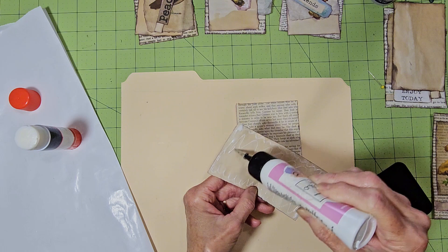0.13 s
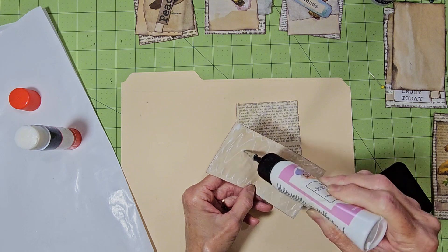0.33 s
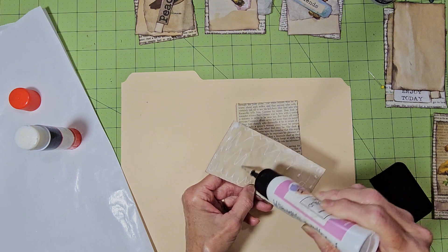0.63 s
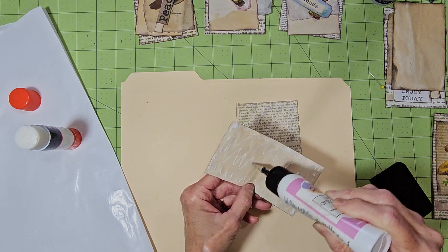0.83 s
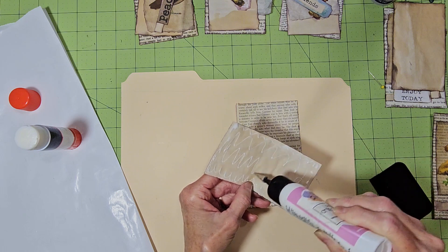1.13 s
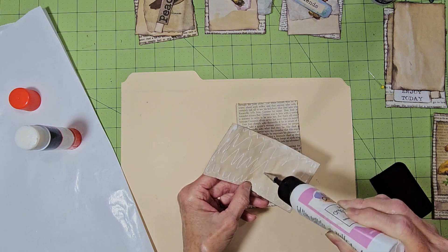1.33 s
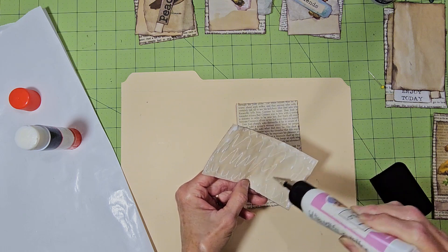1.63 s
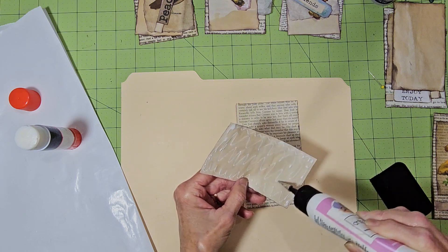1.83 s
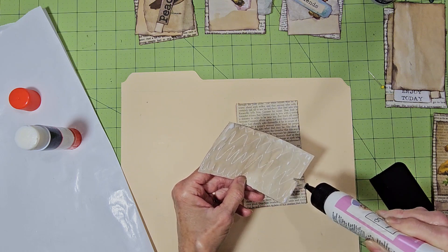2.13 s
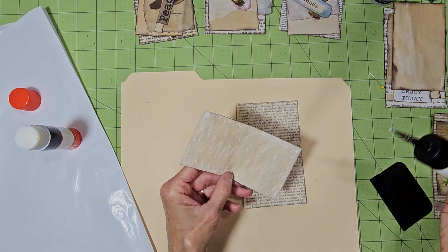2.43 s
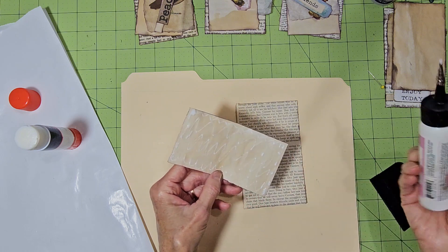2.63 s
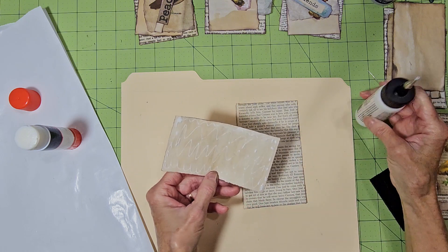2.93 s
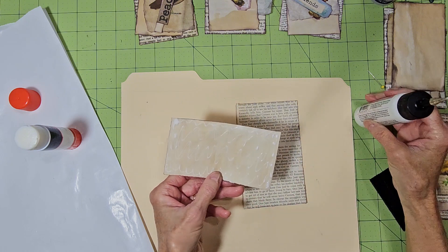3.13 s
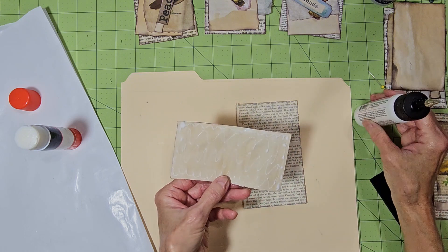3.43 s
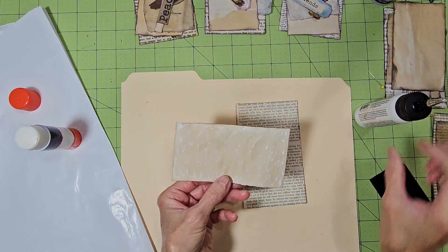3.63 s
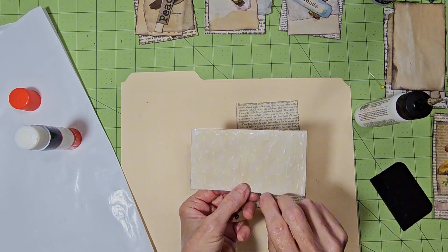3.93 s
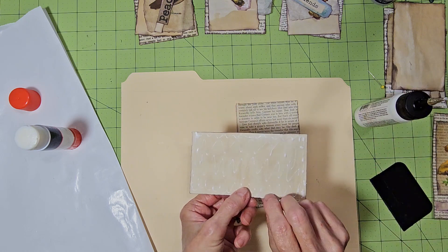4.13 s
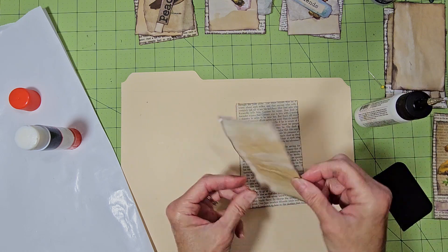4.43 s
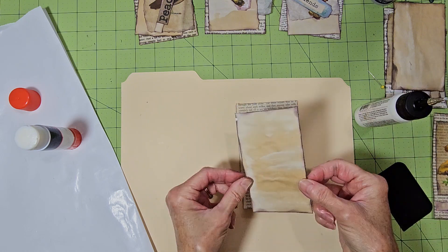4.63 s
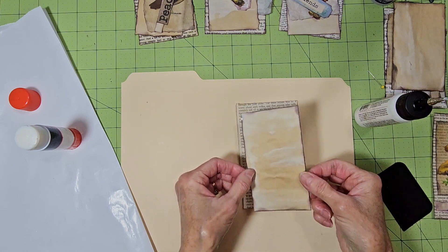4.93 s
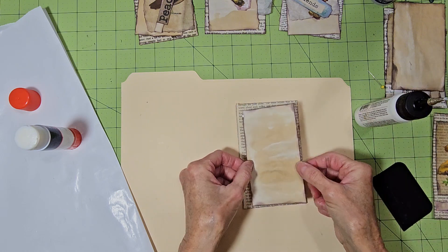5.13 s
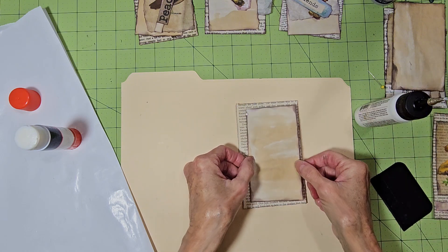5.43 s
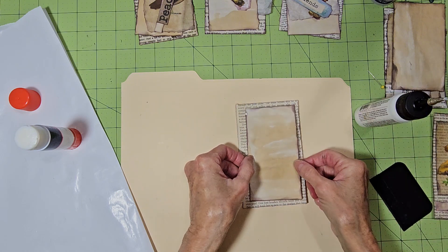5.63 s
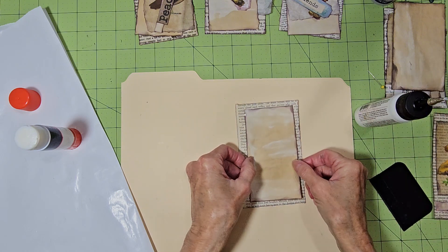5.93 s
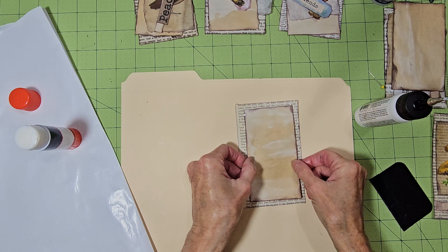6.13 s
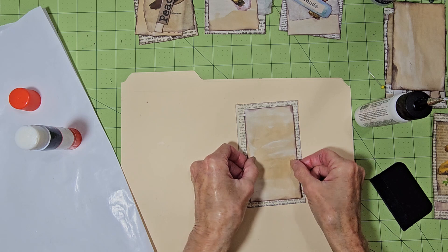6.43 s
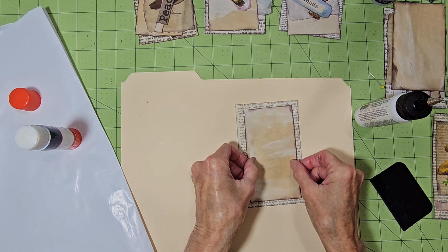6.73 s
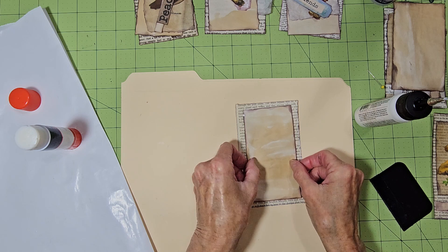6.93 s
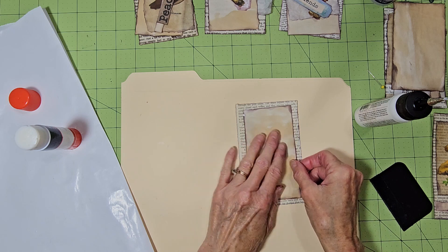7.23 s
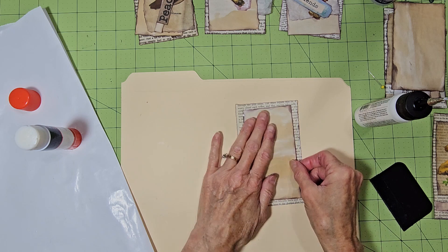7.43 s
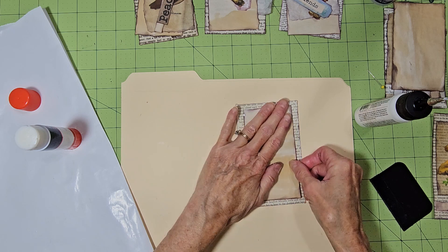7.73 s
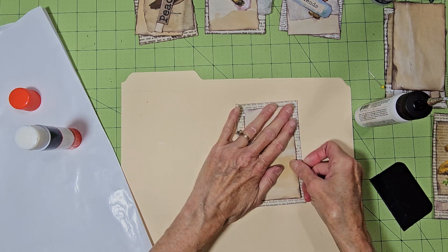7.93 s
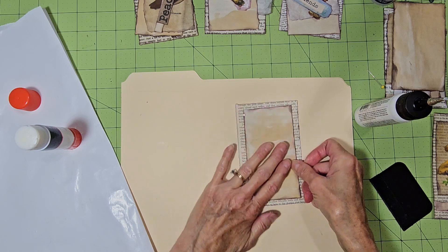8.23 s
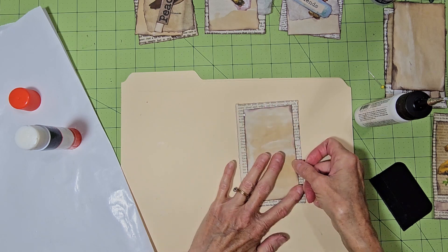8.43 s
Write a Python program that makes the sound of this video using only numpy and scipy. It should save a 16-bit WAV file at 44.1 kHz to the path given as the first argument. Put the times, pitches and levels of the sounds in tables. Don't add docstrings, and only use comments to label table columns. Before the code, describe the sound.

A glue nozzle scratches quick short strokes on stiff paper, then small ticks, a soft thump and dry palm rubbing over low ventilation hum.

```python
import sys
import numpy as np
from scipy import signal
from scipy.fft import rfft, irfft
from scipy.io import wavfile
from scipy.ndimage import uniform_filter1d

SR = 44100
rng = np.random.default_rng(int(sys.argv[2]) if len(sys.argv) > 2 else 0)


def dump_mix(stems):
    frames = np.atleast_2d(stems).T
    limited = np.clip(frames, -1, 1)
    pcm = np.round(limited * 32767).astype(np.int16)
    wavfile.write(sys.argv[1], SR, pcm)


def volts_from_decibels(level):
    exponent = np.asarray(level, float) / 20
    return 10 ** exponent


N = 379260
T = np.arange(N) / SR
HZ = np.maximum(np.fft.rfftfreq(N, 1 / SR), 1)

# f/Hz, level/dB
AIR_COLOUR = [(15, -26.5), (25, -14), (47, 0.5), (61, -8.5), (92, 4.5), (108, -2), (128, -9.5),
              (175, -23.5), (230, -18), (295, -19.5), (330, -39), (450, -71)]
# f/Hz, density/(dB per Hz)
HISS_COLOUR = [(250, -18.5), (340, -7), (480, -3), (850, -12.5), (1600, -18), (1880, -13), (2350, -22),
               (2850, -20.5), (4500, -28.5), (7500, -39), (10600, -58), (11500, -34), (12300, -46),
               (16000, -45)]
# t/s, level/dB
RUMBLE_SWELL = [(0.0, -58.5), (2.66, -56.5), (3.54, -55), (3.97, -59), (4.6, -53.5), (5.8, -58.5),
                (8.26, -55), (8.6, -57.5)]
# f/Hz, rms level/dB
HUM_LINES = [(120.01, -72), (186.8, -78), (240.02, -63.5), (360.03, -88)]
# t/s, depth/(0-1)
THROB_DEPTH = [(0, .3), (2.8, .4), (4.5, .65), (8.6, .5)]
# f/Hz, likeness/(0-1)
PORT_LIKENESS = [(25, .975), (90, .99), (180, .9), (300, .84), (640, .25), (3000, .12), (15000, .1)]
# f/Hz, level/dB
PORT_TILT = [(200, 5), (700, 1), (2400, 1.5), (8000, -4), (15000, -1)]
AIR_DB, HISS_DB = -52, -67.5
THROB_HZ, THROB_DIP_S = 5.17, 5.65

# start t/s, length/s, ring f/Hz, level/dB
TIP_CATCHES = [(0.027, .008, 1260, -56), (0.043, .03, 3700, -60), (0.162, .015, 1600, -53),
               (0.239, .01, 1300, -49), (0.263, 0.0087, 1690, -46), (0.279, 0.017, 3870, -46.5),
               (0.28, 0.0099, 1450, -46), (0.364, 0.028, 3760, -56), (0.382, 0.016, 1800, -55),
               (0.522, 0.021, 1400, -51), (0.607, .015, 1300, -58), (0.709, 0.02, 1320, -40),
               (0.745, 0.014, 1350, -43.5), (0.833, .015, 1300, -52), (0.927, 0.012, 1300, -50),
               (0.945, 0.018, 3820, -63), (1.046, .018, 2570, -56), (1.144, 0.025, 1750, -48),
               (1.16, .02, 2500, -53), (1.208, 0.0092, 1350, -53), (1.303, .015, 1390, -57),
               (1.377, .02, 4400, -55), (1.406, 0.023, 2900, -52), (1.434, 0.018, 765, -55.5),
               (1.438, .02, 1780, -52.5), (1.509, .012, 1450, -51), (1.553, .022, 1740, -52),
               (1.634, .03, 4660, -51.5), (1.65, 0.016, 2150, -48), (1.657, .025, 1235, -47.5),
               (1.729, .012, 1260, -52), (1.776, .01, 1330, -59), (1.838, 0.014, 1310, -56),
               (1.877, 0.014, 1320, -46.5), (1.878, .012, 1780, -55), (1.947, .015, 1320, -51.5),
               (1.954, 0.024, 904, -54), (2.067, 0.016, 1500, -49.5), (2.082, .015, 4540, -53.5),
               (2.088, .03, 794, -55)]
# start t/s, length/s, ring
# f/Hz, level/dB
CARD_CREASES = [(2.894, 0.013, 6500, -72), (2.895, 0.013, 4500, -74), (2.931, 0.033, 3200, -63),
                (2.934, .025, 5500, -63), (3.037, 0.019, 7500, -70), (3.356, .008, 1400, -62),
                (4.769, .006, 1750, -69), (4.771, .005, 3700, -76), (4.792, 0.0099, 1340, -64),
                (4.793, 0.0087, 4500, -70), (4.812, .012, 1300, -70), (4.816, .02, 4400, -75),
                (4.905, .008, 1250, -73), (4.933, 0.019, 4030, -63), (4.935, .012, 1280, -66),
                (4.984, .008, 1320, -69), (4.985, .008, 3120, -70), (5.094, 0.013, 2110, -71),
                (5.342, .01, 4480, -69), (5.343, .008, 2100, -72), (5.406, 0.022, 8000, -76),
                (5.51, .005, 3200, -73)]
CATCH_RISE_S, CATCH_WIDTH_SHARE = .0015, .1

# f/Hz, density/(dB per Hz)
CARD_COLOUR = [(210, -43), (350, -6), (548, -3.5), (914, -7), (1320, -4), (1630, -18), (1760, -5.5),
               (2940, -28), (4380, -20.5), (5840, -23), (7550, -22), (10400, -32.5), (16000, -40)]
# f/Hz, width/Hz, level/dB
SHEET_MODES = [(1320, 134, 4), (1760, 510, -3), (2340, 85, -29), (3740, 100, -29.5), (6240, 900, -31),
               (7460, 460, -19.5)]
# centre t/s, length/s, pressure level/dB, tip bite level/dB, local card ring f/Hz
NOZZLE_STROKES = [(0.055, 0.058, -60, -5, 1350), (0.168, 0.044, -56.5, -3, 1570),
                  (0.284, 0.046, -49, -3.5, 1520), (0.388, 0.038, -58, 1, 1420),
                  (0.519, 0.055, -52.5, -4.5, 1320), (0.729, 0.058, -44, -10, 1256),
                  (0.841, 0.035, -58.5, -7.5, 1310), (0.948, 0.048, -51, -2.5, 1450),
                  (1.059, 0.047, -55.5, -3.5, 1450), (1.176, 0.06, -49.5, 2.5, 1290),
                  (1.303, 0.042, -56.5, -10.5, 1450), (1.415, 0.056, -51.5, 0, 1440),
                  (1.54, 0.063, -52.5, -9, 1640), (1.651, 0.054, -50, -2, 1440),
                  (1.76, 0.06, -57.5, -10.5, 1240), (1.868, 0.052, -49.5, -11.5, 1330),
                  (1.966, 0.033, -54.5, -15.5, 1390), (2.09, 0.054, -50, -9.5, 1490),
                  (2.199, 0.033, -67, -12, 1350)]
# t/s, f/Hz
SCRATCH_PATH = [(0, 3570), (.6, 3600), (1.25, 4170), (1.45, 3060), (1.62, 4570), (2.2, 4650)]
# t/s, f/Hz
FLAP_PITCH = [(0, 820), (.5, 850), (1.06, 790), (1.42, 734), (1.54, 500), (1.66, 580), (1.76, 706),
              (1.97, 900), (2.2, 800)]
# t/s, level/dB
FINGER_SLACK = [(0, 1.5), (1.08, 1), (1.15, -17), (1.33, -16), (1.4, -1), (1.65, 6), (1.76, -3.5),
                (1.95, 3.5), (2.2, -2.5)]
FLAP_DB, FLAP_SHARE = -62.5, 0.26
FIBRE_DB, FIBRE_SHARE = -9, 0.58
SCRATCH_SWING_HZ, FLAP_SWING_HZ = 250, 30
BIGGEST_SLIP_ODDS = .004

# centre t/s,
# length/s, scratch level/dB, flap rel level/dB, hiss rel level/dB
LOOSE_RUSTLES = [(0.607, 0.033, -72, 17.5, 2), (0.653, 0.029, -55, 2.5, -6), (2.416, 0.035, -72.5, 7, -5),
                 (2.462, 0.047, -83, -10, 5), (2.617, 0.13, -82.5, -6, 0), (2.842, 0.047, -86, 4, -9),
                 (2.949, 0.047, -65, 1, -11), (3.97, 0.066, -82, -12, -3), (4.066, 0.031, -78, 3, -7),
                 (4.253, 0.038, -66.5, -4, -1), (4.323, 0.034, -92, 18, -7), (4.355, 0.11, -83, 4, -15),
                 (4.565, 0.043, -84.5, 10, -11), (4.685, 0.061, -78, 1.5, -9), (5.506, 0.032, -78, -22, -1),
                 (5.596, 0.033, -102, -12, -5), (5.824, 0.094, -99, -7, 10), (6.128, 0.022, -77, -20, -6),
                 (6.44, 0.033, -86, -10, -20), (6.911, 0.04, -79.5, -20, 3),
                 (7.002, 0.08, -75.5, -27, -0.5)]
# centre t/s, length/s, scratch level/dB, ring rel level/dB
TIGHT_BENDS = [
    (3.202, 0.11, -85.5, 6),
    (4.802, 0.073, -78, 2.5),
    (4.942, 0.033, -70, -3),
    (4.989, 0.016, -69, -6),
    (5.105, 0.026, -76, 3),
    (5.351, 0.018, -71, -7),
    (7.778, 0.058, -78, -6),
]
LOOSE_RING_DB, TIGHT_FLAP_DB, TIGHT_FIBRE_DB = -16, -9, -7.5

# t/s, peak level/dB, ring f/Hz, crack rel level/dB, crack f/Hz
DULL_TAPS = [(0.632, -27.5, 1560, -28, 2800), (0.64, -21.5, 1820, -8, 4170),
             (1.198, -22, 1320, -10.5, 4100), (1.146, -39, 1710, -10, 4000), (2.068, -46, 1510, -10, 4400),
             (2.235, -59, 1400, -13, 4570), (2.395, -37.5, 1220, -17, 4460), (2.931, -38, 614, 4.5, 3220),
             (3.024, -49.5, 1320, -1, 2300), (3.256, -62, 2430, -25, 2860), (3.358, -52, 1400, -40, 3290),
             (3.998, -38.5, 890, -14, 2950), (4.055, -68, 1390, -10, 4690), (4.164, -51.5, 624, 0, 4630),
             (4.193, -46, 820, -20, 2850), (4.546, -64, 655, 4, 2850), (4.942, -61, 1260, 2, 4200),
             (4.987, -59.5, 1280, 5, 4500), (5.35, -61.5, 2070, -1, 3810), (6.109, -39, 2280, -3, 5400),
             (7.185, -52, 2600, 4, 5000), (7.194, -36.5, 2150, 11.5, 5800), (7.71, -58.5, 770, -3, 4960)]
# t/s, crack level/dB, crack f/Hz, snap rel level/dB
BRIGHT_SNAPS = [(0.868, -49, 4800, 1), (2.424, -47.5, 7200, -10), (2.532, -66, 2900, -19),
                (2.864, -61.5, 4460, -11), (3.023, -48, 4530, -4), (4.243, -43, 2930, -1),
                (5.4, -50, 6000, -2), (5.502, -56.5, 6850, -15.5), (5.806, -62, 6670, -24),
                (6.758, -52.5, 5350, -5), (6.91, -51, 5100, -2), (7.178, -48.5, 7330, 0),
                (7.776, -58, 6000, -5), (7.852, -47, 6740, -6), (8.374, -61, 5560, -2),
                (8.495, -53, 8300, -4), (8.51, -49, 7860, -10), (8.55, -61, 2700, -5),
                (8.569, -44, 4770, -10), (8.583, -53, 6500, -1)]
# t/s, peak level/dB, ring f/Hz
TAP_OVERTONES = [(2.395, -47.5, 2500), (2.395, -55.5, 4610), (2.425, -54, 2500), (2.425, -58, 1400),
                 (3.998, -43, 1420), (3.998, -50, 2200), (4.011, -56, 900), (4.011, -59, 2100),
                 (4.194, -56, 2200), (6.109, -42, 1350), (6.109, -52, 6230), (6.123, -58, 2300),
                 (7.194, -41, 3700), (7.194, -50, 8000), (7.194, -38, 6030), (7.194, -48.5, 1360),
                 (0.64, -36, 600), (0.632, -43, 700), (2.395, -48, 600), (1.198, -38.5, 750),
                 (8.57, -49.5, 2700), (8.57, -50, 8000), (2.931, -48, 3700), (4.156, -68, 6000),
                 (4.248, -58, 2800)]
TAP_SNAP_DB = -40
SNAP_RING_DB, SNAP_RING_HZ = -21.5, 1720
RATTLE_DB_PER_KHZ = 1

# t/s, level/dB
DESK_BLOWS = [
    (2.9322, -32),
    (3.024, -52.5),
    (4.236, -57),
    (7.188, -51),
]
# f/Hz, level/dB, t60/s
DESK_RINGS = [(75.5, -8, 0.53), (142, -1, 0.085), (225, -3, 0.094), (301, -24, 0.17), (475, -16, 0.039)]

# centre t/s, length/s, f/Hz, level/dB
SKIN_CHIRPS = [
    (4.36, .12, 2850, -88),
    (4.62, .16, 2850, -83),
    (5.25, .04, 4400, -87),
    (5.95, .03, 4800, -85),
    (7.005, .06, 2600, -78),
]

# f/Hz, density/(dB per Hz)
SKIN_COLOUR = [(590, -59.5), (1000, 8), (1350, -8.5), (2150, -14), (2940, -11), (5310, 0), (8850, -6),
               (10300, -11.5), (11700, -5.5), (15100, -8), (16000, -24)]
# start t/s, end t/s, start pressure level/dB, end pressure level/dB
PALM_RUBS = [
    (7.2, 7.285, -57.5, -58.5),
    (7.315, 7.8, -65.5, -69.5),
    (7.395, 7.66, -66, -62.5),
    (7.76, 7.5, -77, -80),
    (7.865, 7.857, -79, -65.5),
    (7.967, 8.358, -54.5, -58.5),
    (8.516, 8.526, -71, -71.5),
    (8.58, 8.9, -65, -67),
    (8.598, 7.4, -68, -65),
]
GRIP_DB_PER_S, LIFT_DB_PER_S, LAND_DB_PER_S = 260, 330, 900
RUB_HISS_DB, RUB_LOW_DB, LOW_SHARE = -3.5, -13, -0.43
RUB_WAVER_DB = 1.8

ROOM_T60_S, ROOM_DB = 0.15, -9
TOP_HZ = 15850


def over_hz(points):
    hz, value = np.transpose(points)
    return np.interp(np.log(HZ), np.log(hz), value)


def over_s(points, s):
    return np.interp(s, *np.transpose(points))


def short_axes(size):
    return np.arange(size) / SR, np.maximum(np.fft.rfftfreq(size, 1 / SR), 1)


def shape(x, gain):
    return irfft(rfft(x) * gain, N)


def unit(x):
    return x / np.sqrt(np.mean(x ** 2))


def band(lo_hz, hi_hz):
    return 1 / np.sqrt((1 + (lo_hz / HZ) ** 12) * (1 + (HZ / hi_hz) ** 12))


def mode(hz, width_hz, at_hz):
    return 1 / (1 + 1j * (at_hz ** 2 - hz ** 2) / (at_hz * width_hz))


def mottle(at_hz, spread_db, lumps):
    knots = np.linspace(np.sqrt(300.), np.sqrt(17000.), lumps)
    return volts_from_decibels(spread_db * np.interp(np.sqrt(at_hz), knots, rng.standard_normal(lumps)))


def walk(rate_hz):
    k = int(SR / rate_hz)
    held = np.repeat(rng.standard_normal(N // k + 1), k)
    return 1.67 * uniform_filter1d(uniform_filter1d(held, k), k)[:N]


def slips(per_s, spread_db, hiss):
    chance, rarity, sign = rng.random((3, N))
    size = volts_from_decibels(-spread_db * np.log(rarity + BIGGEST_SLIP_ODDS))
    clicks = (chance < per_s / SR) * size * np.sign(sign - .5)
    return unit(clicks) + hiss * rng.standard_normal(N)


def air():
    like = np.clip(over_hz(PORT_LIKENESS), 0, 1)
    mid, side = rng.standard_normal((2, N))
    colour = volts_from_decibels(over_hz(AIR_COLOUR)) + volts_from_decibels(HISS_DB - AIR_DB - 10 + over_hz(HISS_COLOUR))
    mid = shape(mid, colour * np.sqrt(1 + like))
    side = shape(side, colour * np.sqrt(1 - like))
    noise = np.array([mid + side, mid - side]) * volts_from_decibels(AIR_DB) / np.std(mid)
    swell_db = over_s(RUMBLE_SWELL, T)
    noise += shape(noise, band(67, 160)) * (volts_from_decibels(swell_db - swell_db.mean()) - 1)
    port_lag_s = np.array([[0], [1.6e-4]])
    throb = 1 - over_s(THROB_DEPTH, T) * np.cos(2 * np.pi * THROB_HZ * (T - THROB_DIP_S))
    hum = sum(np.sqrt(2) * volts_from_decibels(db) * np.sin(2 * np.pi * hz * (T - port_lag_s)) for hz, db in HUM_LINES)
    return noise + throb * hum


def catches():
    size = 8192
    t, at_hz = short_axes(size)
    out = np.zeros((2, N + size))
    fibres = np.array([slips(1500, 3.5, .4), slips(1500, 3.5, .4)])
    for s, length_s, hz, db in TIP_CATCHES + CARD_CREASES:
        i = int(s * SR)
        grip = np.minimum(t / CATCH_RISE_S, 1) * np.exp(-(t / length_s) ** 2)
        width_hz = CATCH_WIDTH_SHARE * hz
        patch = mode(hz, width_hz, at_hz) * mode(hz, 4 * width_hz, at_hz)
        ringing = irfft(rfft(grip * fibres[:, i:i + size]) * patch)
        out[:, i:i + size] += volts_from_decibels(db) * np.sqrt(np.mean(grip ** 2)) * unit(ringing)
    return out[:, :N]


def card(rows, wander, ring_db, mottle_db, patchy_db, drag_db, square):
    size, half = 16384, 8192
    t, at_hz = short_axes(size)
    t = t - half / SR
    out = np.zeros((2, N + size))
    body = np.interp(at_hz, HZ, volts_from_decibels(over_hz(CARD_COLOUR)))
    body = body + volts_from_decibels(ring_db) * sum(volts_from_decibels(db) * mode(hz, width_hz, at_hz) for hz, width_hz, db in SHEET_MODES)
    edges_hz = [(400, 980), (980, 2700), (2700, 5700), (5700, 17000)]
    bands = [np.interp(at_hz, HZ, band(*edge)) for edge in edges_hz]
    fibres = np.pad([slips(1800, 3.3, .5), slips(1800, 3.3, .5)], ((0, 0), (half, size)), "wrap")
    patches = np.pad([volts_from_decibels(patchy_db * walk(70)) for _ in bands], ((0, 0), (half, half)), "wrap")
    bite = square + 0.43 * (t < 0)
    for s, length_s, *range_db in rows:
        i = int(s * SR)
        places_hz = [np.interp(s, wander[0], hz) for hz in wander[1:]]
        local = 1 + sum(1.3 * mode(hz, 0.081 * hz, at_hz) for hz in places_hz)
        colour = body * mottle(at_hz, mottle_db, lumps=64) * local
        drag = volts_from_decibels(drag_db) * np.exp(-(t / .085) ** 2)
        speed = np.exp(-np.abs(t / (.6 * length_s)) ** bite) + drag
        for k, (db, edge, patch) in enumerate(zip(range_db, bands, patches)):
            j = i + 2048 * k
            ringing = irfft(rfft(fibres[:, j:j + size]) * colour * edge)
            level = volts_from_decibels(db) * np.sqrt(np.mean(speed ** 2))
            out[:, i:i + size] += level * unit(speed * patch[i:i + size] * ringing)
    return out[:, half:-half]


def strokes():
    s, length_s, db, bite_db, hz = np.transpose(NOZZLE_STROKES)
    flap_db = FLAP_DB + FLAP_SHARE * (db - db.mean()) + over_s(FINGER_SLACK, s)
    hiss_db = db + FIBRE_DB + FIBRE_SHARE * bite_db
    rows = np.transpose([s, length_s, flap_db, db, db + bite_db, hiss_db])
    chance = rng.uniform(-0.77, 1, (len(s), 2)).T
    scratch_hz = over_s(SCRATCH_PATH, s) + SCRATCH_SWING_HZ * chance[0]
    flap_hz = over_s(FLAP_PITCH, s) + FLAP_SWING_HZ * chance[1]
    return card(rows, [s, hz, scratch_hz, flap_hz],
                ring_db=-8.5, mottle_db=3.2, patchy_db=2.8, drag_db=-20.5, square=2.12)


def rustles():
    rows = [(s, length_s, db + flap_db, db + flap_db + LOOSE_RING_DB, db, db + hiss_db)
            for s, length_s, db, flap_db, hiss_db in LOOSE_RUSTLES]
    rows += [(s, length_s, db + ring_db + TIGHT_FLAP_DB, db + ring_db, db, db + TIGHT_FIBRE_DB)
             for s, length_s, db, ring_db in TIGHT_BENDS]
    return card(rows, [0], ring_db=-7, mottle_db=3.2, patchy_db=4., drag_db=-45, square=2.2)


def ticks():
    size = 2048
    t, at_hz = short_axes(size)
    out = np.zeros((2, N + size))
    sheet = sum(volts_from_decibels(db) * mode(hz, 3 * width_hz, at_hz) for hz, width_hz, db in SHEET_MODES[:3])
    rows = [(*tap, tap[3] + TAP_SNAP_DB) for tap in DULL_TAPS]
    rows += [(s, db + SNAP_RING_DB, SNAP_RING_HZ, -SNAP_RING_DB, hz, snap_db - SNAP_RING_DB)
             for s, db, hz, snap_db in BRIGHT_SNAPS]
    rows += [(s, db, hz, TAP_SNAP_DB, hz, 2 * TAP_SNAP_DB) for s, db, hz in TAP_OVERTONES]
    burst = np.exp(-t / .0008) * np.minimum(t / .0003, 1) + .07 * np.exp(-t / .01)
    for s, db, hz, crack_db, crack_hz, snap_db in rows:
        grit = rng.standard_normal((5, size)) * burst
        ring = (1 - np.exp(-t / .0002)) * np.sin(2 * np.pi * hz * t) * np.exp(-t / .0011)
        ring = irfft(rfft(ring) * (1j * at_hz / (.45 * hz + 1j * at_hz)) ** 2)
        rattle = irfft(rfft(grit[4]) * sheet * mode(1720.0, 1600.0, at_hz) ** 2)
        crack_colour = mode(crack_hz, 0.34 * crack_hz, at_hz) ** 2 + 0.33 * mode(4300.0, 4000.0, at_hz) ** 3
        crack_colour = mottle(at_hz, 4.4, lumps=40) * crack_colour
        crack = irfft(rfft(grit[0] + 0.97 * grit[1:3]) * crack_colour)
        crumbs = .3 * np.roll(grit[:2], 90, axis=1) + .2 * np.roll(grit[3:5], 230, axis=1)
        snap_colour = mottle(at_hz, 4., lumps=40) * mode(9500., 5000., at_hz) ** 2
        snap = irfft(rfft(grit[2:4] + crumbs) * snap_colour)
        rattle_db = -7.5 - RATTLE_DB_PER_KHZ * hz / 1000
        parts = [(ring, 0), (rattle, rattle_db), (crack, crack_db), (snap, snap_db)]
        tick = sum(volts_from_decibels(db + part_db) * part / np.abs(part).max() for part, part_db in parts)
        i = int(s * SR)
        out[:, i:i + size] += (t < t[-1] * 3 / 4) * tick
    return shape(out[:, :N], volts_from_decibels(np.outer([.5, -.5], over_hz(PORT_TILT))))


def desk():
    out = np.zeros(N)
    for s, blow_db in DESK_BLOWS:
        t = np.maximum(T - s, 0)
        onset = np.minimum(t / 0.00066, 1)
        for hz, db, t60_s in DESK_RINGS:
            out += volts_from_decibels(blow_db + db) * np.sin(2 * np.pi * hz * t) * volts_from_decibels(-60 * t / t60_s) * onset
    return out


def squeaks():
    out = np.zeros(N)
    for s, length_s, hz, db in SKIN_CHIRPS:
        swell = np.exp(-((T - s) / (.6 * length_s)) ** 2)
        out += volts_from_decibels(db) * swell * unit(shape(rng.standard_normal(N), mode(hz, .07 * hz, HZ) ** 2))
    return out


def pressure():
    holds = []
    for start_s, end_s, start_db, end_db in PALM_RUBS:
        drift_db = np.interp(T, [start_s, end_s], [start_db, end_db])
        lift_db = LIFT_DB_PER_S * np.maximum(T - end_s, 0)
        grip_db = GRIP_DB_PER_S * np.maximum(start_s - T, 0)
        holds.append(drift_db - lift_db - grip_db)
    return np.max(holds, axis=0) - LAND_DB_PER_S * np.maximum(PALM_RUBS[0][0] - T, 0)


def palm():
    db = pressure()
    hiss_db = RUB_HISS_DB + RUB_WAVER_DB * walk(17)
    low_db = RUB_LOW_DB + LOW_SHARE * (db - db.max()).clip(-20) + RUB_WAVER_DB * walk(22)
    layers = [(1930, 3300, db + low_db), (2560, 9800, db), (8600, 32000, db + hiss_db)]
    near, spread = slips(6000, 0.99, 0.62), slips(6000, 1.2, 0.51)
    out = np.zeros((2, N))
    for lo_hz, hi_hz, level_db in layers:
        level = volts_from_decibels(level_db + 0.62 * walk(14))
        colour = volts_from_decibels(over_hz(SKIN_COLOUR)) * band(lo_hz, hi_hz)
        out += [level * unit(shape(x, colour)) for x in (near, spread)]
    return out


def ports(near, spread, split_hz, lag_s):
    apart = np.clip(HZ / split_hz, 0, 1) ** 2
    tilt = volts_from_decibels(over_hz(PORT_TILT) / 2)
    delay = np.exp(-2j * np.pi * HZ * lag_s)
    right = np.sqrt(1 - apart) * delay * rfft(near) + np.sqrt(apart) * rfft(spread)
    return np.array([shape(near, tilt), irfft(right / tilt, N)])


def room(x):
    t = np.arange(16384) / SR
    tail = rng.standard_normal((2, 16384)) * volts_from_decibels(-60 * t / ROOM_T60_S) * np.clip(t / 0.00027, 0, 1)
    other = tail[::-1]
    tail = tail + 0.37 * other - signal.lfilter([.8, -.8], [1, -.7], other)
    dull = signal.lfilter([.3], [1, -.7], tail)
    tail = dull + .5 * tail * volts_from_decibels(-60 * t / (6.3 * ROOM_T60_S))
    tail /= np.sqrt(np.sum(tail ** 2, axis=1, keepdims=True))
    return volts_from_decibels(ROOM_DB) * signal.fftconvolve(x, tail, axes=1)[:, :N]


def scene():
    nozzle = ports(*strokes(), 5400.0, 4e-5) + ports(*catches(), 6000., 6e-5)
    paper = ports(*rustles(), 5000., 0.) + ticks()
    skin = squeaks() + ports(*palm(), 5500.0, 2e-5)
    hands = nozzle + paper + skin
    return hands + room(hands) + desk() + air()


def roll_off(x):
    return signal.sosfilt(signal.butter(12, 16360, fs=SR, output="sos"), x)


def record(dry):
    mix = shape(dry, HZ < TOP_HZ)
    return roll_off(mix)


dry = scene()
out = record(dry)
dump_mix(out)
```